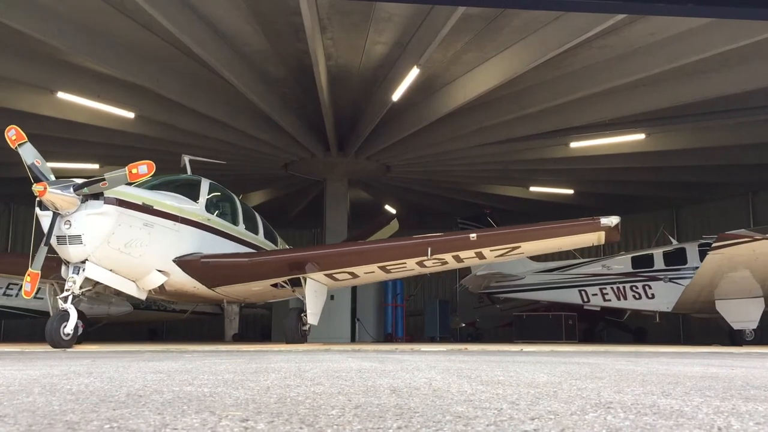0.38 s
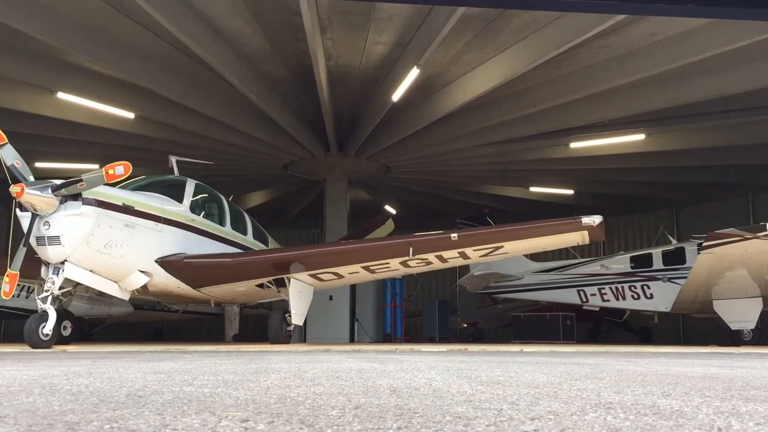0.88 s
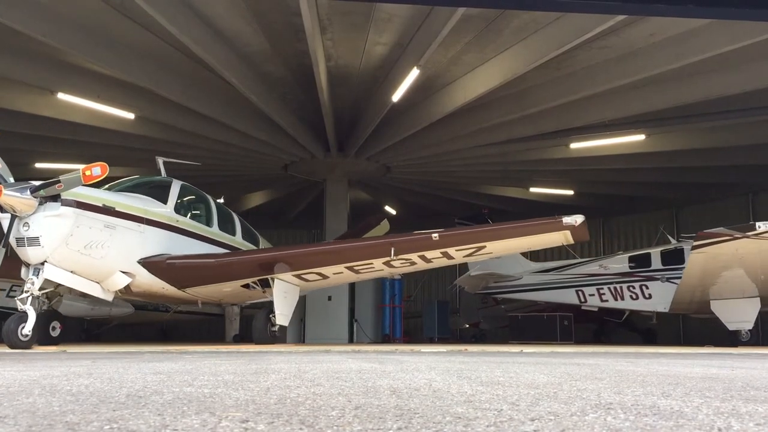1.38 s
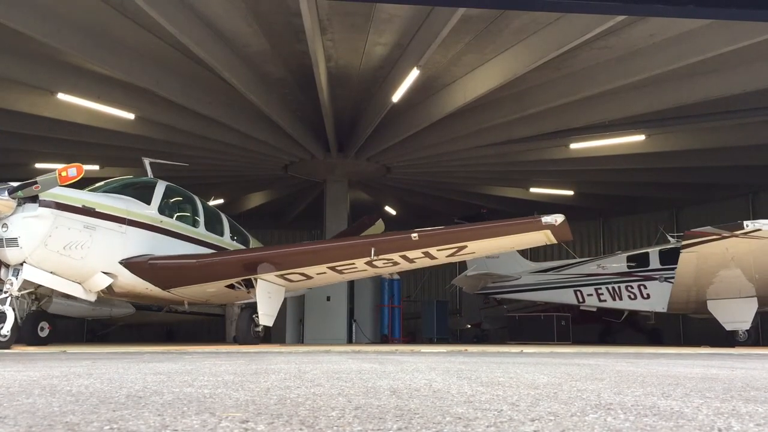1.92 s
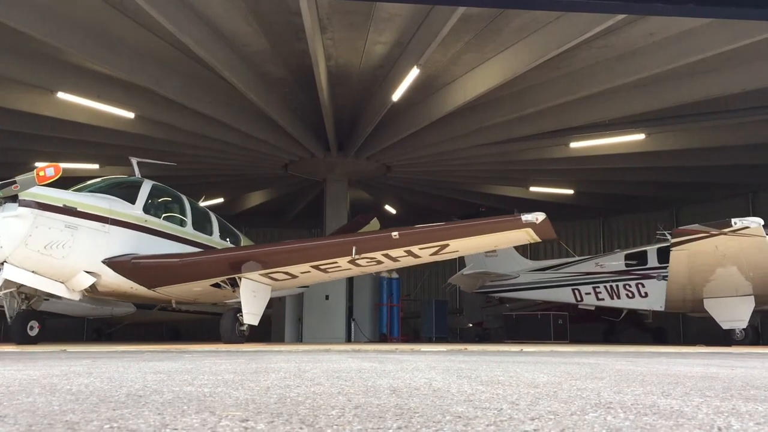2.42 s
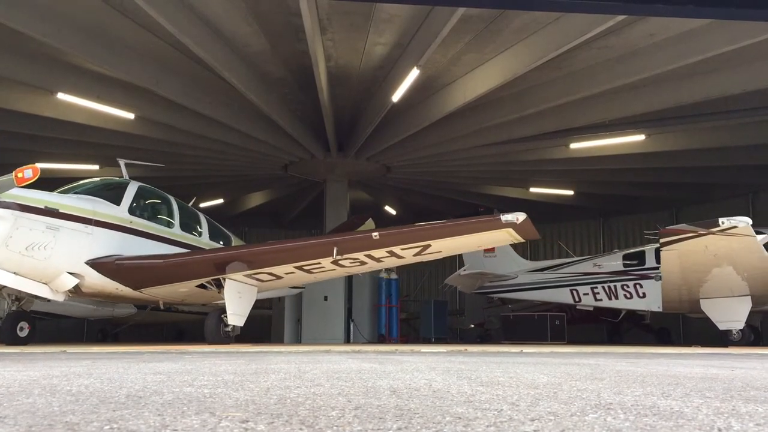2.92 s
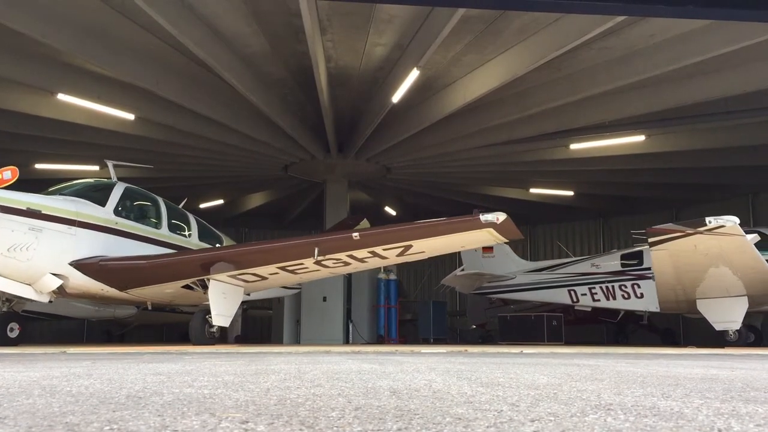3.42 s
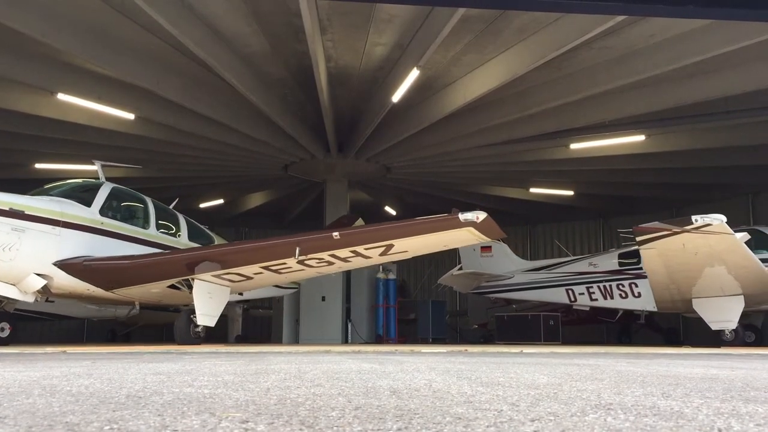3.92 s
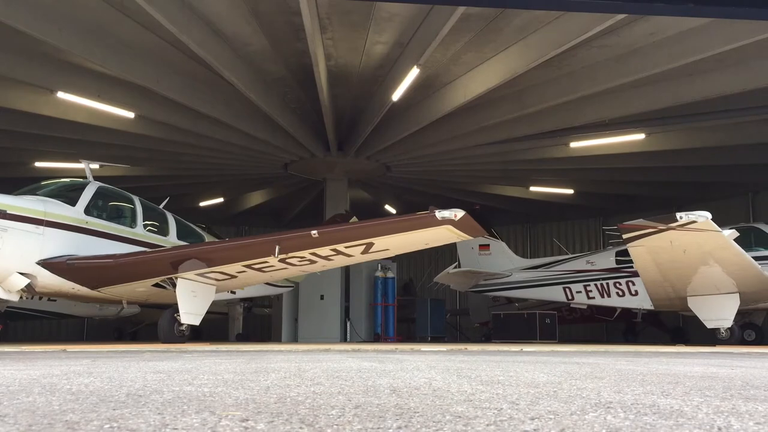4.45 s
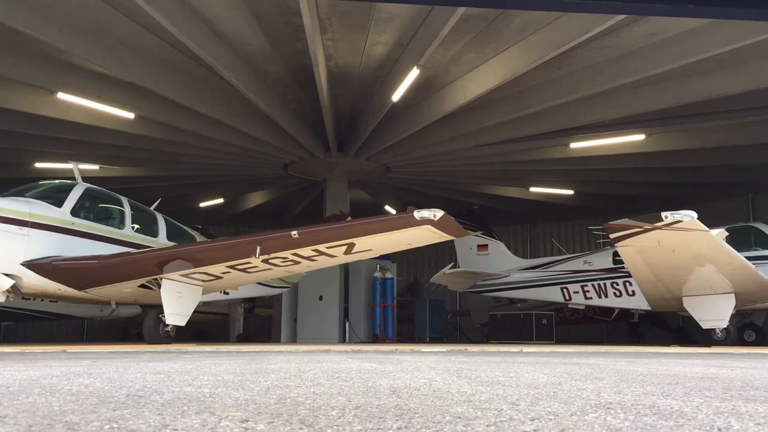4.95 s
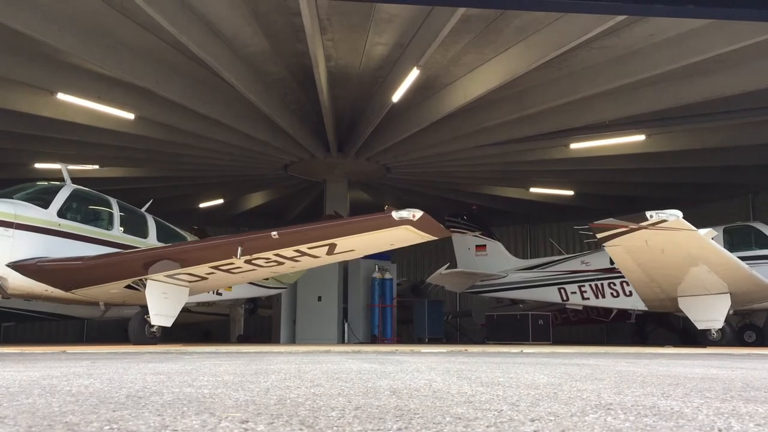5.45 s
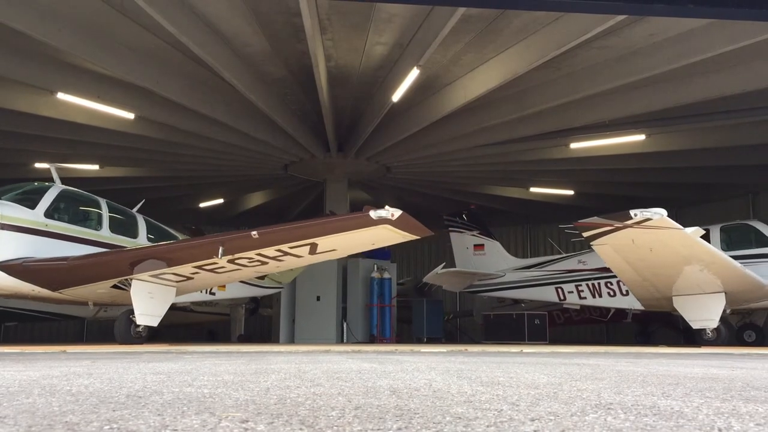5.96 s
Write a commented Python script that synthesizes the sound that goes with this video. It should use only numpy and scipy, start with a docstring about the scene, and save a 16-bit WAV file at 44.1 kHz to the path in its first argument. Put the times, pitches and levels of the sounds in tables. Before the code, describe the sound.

A deep, bass-heavy rumble is present from 0 to 6 seconds, as rollers carry a large steel turntable with small aircraft around a round hangar. It wavers gently, with quiet gritty rolling noise above. At about 0.47 s a heavy low double thump lands, the grit swells, and the frame groans in short mid-pitched slips until about 1 s; a small bright clack comes near 0.68 s. Faint dry scrapes occur mostly before 2.6 s. A very thin, steady gear whine is slightly clearer between 1 and 3 s. Light metallic ticks thicken from 1.7 s, with a sharper one at 2.6 s. Another low thump falls at 3.0 s and a softer one at 4.5 s, each dying in long echo. Ticks at 4.3 s and a busier cluster from 5.2 s lead to the end, with tiny chirps near 5.6 s. Faint phone microphone hiss stays constant; the rumble continues until the cut.

```python
"""A deep rumble rolls from the start: rollers on their rail shake the deck of a large steel turntable
that turns slowly in a round hangar. Filtered, wavering noise makes the rumble and its grit.
Low thumps, a bright clack, broad washes and groans are short noise swells in a long echo of dying noise.
Small parts tick as struck modes, metal scrapes in dense grains and chirps thinly as it rubs.
The drive whines faintly as one wavering tone; a phone microphone adds steady hiss."""
import sys
import numpy as np
from scipy import signal
from scipy.fft import rfft, irfft, next_fast_len
from scipy.io import wavfile
from scipy.ndimage import uniform_filter1d

SR = 44100
rng = np.random.default_rng(int(sys.argv[2]) if len(sys.argv) > 2 else 0)


def field_ratio(decibels):
    """Amplitude ratio for a level in dB (20 dB per decade); scalars and array-likes work."""
    return 10 ** (np.asarray(decibels, dtype=float) / 20)


def dump(signal):
    """Clip the signal to [-1, 1] and save it as 16-bit WAV at the path in sys.argv[1]."""
    limited = np.clip(np.atleast_2d(signal).T, -1, 1)
    pcm = np.round(limited * 32767).astype(np.int16)
    wavfile.write(sys.argv[1], SR, pcm)


N = 268569  # length of the scene in samples


def rms_one(x):
    """Scale to unit rms."""
    return x / np.sqrt(np.mean(x ** 2) + 1e-20)


def filtered(x, order, hz, kind="low"):
    """Butterworth filter with its corner or corners at hz."""
    return signal.sosfilt(signal.butter(order, hz, kind, fs=SR, output="sos"), x)


def drift(rate_hz):
    """Slow random wander with spread 1: noise at a fortieth of SR, twice through a one-pole low-pass."""
    r = np.exp(-80 * np.pi * rate_hz / SR)
    noise = rng.standard_normal(N // 40 + 2002)
    slow = signal.lfilter([1], [1, -2 * r, r * r], noise)[2000:]  # drop the filter's run-in
    return np.interp(np.arange(N) / 40, np.arange(len(slow)), rms_one(slow))


def coloured_noise(spectrum, patchy_db, rate_hz):
    """Noise of the given spectrum whose overlapping half-octave bands each waver in level; rms 1."""
    size = next_fast_len(N)
    octave = np.log2(np.maximum(np.fft.rfftfreq(size, 1 / SR), 1))
    hz, level_db = np.transpose(spectrum)
    shape_db = np.interp(octave, np.log2(hz), level_db, -150, -150)
    bins = rfft(rng.standard_normal(size)) * field_ratio(shape_db)
    out = np.zeros(N)
    for centre in np.arange(np.floor(np.log2(hz[0])), np.log2(hz[-1]) + .5, .5):
        band = np.clip(1 - 2 * np.abs(octave - centre), 0, 1)
        out += irfft(bins * band, size)[:N] * field_ratio(patchy_db * drift(rate_hz))
    return rms_one(out)


def resonance(x, hz, width_hz):
    """Two-pole band-pass, gain 1 on top."""
    r = np.exp(-np.pi * width_hz / SR)
    poles = [1, -2 * r * np.cos(2 * np.pi * hz / SR), r * r]
    return signal.lfilter(np.array([1, 0, -1]) * (1 - r * r) / 2, poles, x)


def ring(clicks, modes):
    """Every click strikes every decaying mode with a strength of its own."""
    contact_width_hz = 300  # a soft contact lets each mode build up over about a millisecond
    out = np.zeros(N)
    for hz, level_db, t60_s in modes:
        r, w = field_ratio(-60 / (t60_s * SR)), 2 * np.pi * hz / SR
        blows = clicks * field_ratio(level_db + 1.6 * rng.standard_normal(N)) + 1e-18
        mode = signal.lfilter([0, np.sin(w)], [1, -2 * r * np.cos(w), r * r], blows)
        out += resonance(mode, hz, contact_width_hz)
    return out


def swells(rows):
    """Each row is a short swell of steeply banded noise, its own flutter partly evened out."""
    out, size = np.zeros(N + SR), SR // 2
    t = np.arange(size) / SR
    for start_s, level_db, hz, width_hz, length_s in rows:
        band = rng.standard_normal(2 * size)
        for _ in range(4):
            band = resonance(band, hz, 2 * width_hz)
        band = rms_one(band[size:])
        band = band / np.sqrt(.3 + uniform_filter1d(band ** 2, size=int(SR / width_hz)))
        rise = np.sin(np.pi / 2 * np.clip(t / length_s, 0, 1)) ** 2
        fall = np.exp(1 - t / length_s)
        out[round(start_s * SR):][:size] += field_ratio(level_db) * band * rise * fall
    return filtered(out[:N], 2, 12000)


def hall(x):
    """Diffuse echo: dying noise, the treble dying faster, after a short gap."""
    t60_s, treble_t60_s, split_hz, gap_s = 2.8, .3 * 2.8, 2500, .008
    t = np.arange(3 * SR) / SR
    tail = rng.standard_normal(len(t)) * (t > gap_s)
    low = filtered(tail, 1, split_hz)
    echo = low * field_ratio(-60 * t / t60_s) + (tail - low) * field_ratio(-60 * t / treble_t60_s)
    return signal.fftconvolve(x, echo / np.sqrt(np.sum(echo ** 2)))[:N]


def near_echoes(x):
    """Deck, aircraft and roof send back a scattered group of echoes soon after each tick."""
    gap_s, bend_s = .007, .024
    t = np.arange(SR // 10) / SR
    # falls 300 dB per second, and 1000 dB per second after the bend
    window = (t > gap_s) * field_ratio(-np.maximum(t - bend_s, 0) * 700 - t * 300)
    scattered = rng.standard_normal(len(t)) * (rng.random(len(t)) < .08)
    echo = scattered * window
    return signal.fftconvolve(x, echo / np.sqrt(np.sum(echo ** 2)))[:N]


# Loudness of the drive gears: time_s, level_db (rms)
WHINE_LEVELS = [(0, -66), (1.1, -61.5), (2.5, -61), (4.2, -66), (6.09, -68)]


def whine():
    """The drive's gears give a thin sine tone that wavers a little in pitch."""
    pitch_hz = 894.5 + .6 * drift(1.2)
    time_s, level_db = np.transpose(WHINE_LEVELS)
    level = field_ratio(np.interp(np.arange(N) / SR, time_s, level_db))
    return level * np.sqrt(2) * np.sin(2 * np.pi * np.cumsum(pitch_hz) / SR)


# Thin chirps of rubbing metal: start_s, level_db, pitch_hz
CHIRPS = [(3.995, -74.5, 8000), (5.603, -70.5, 5090), (5.603, -75.5, 6100), (5.678, -73, 6120),
          (5.678, -79, 7800), (5.678, -75.5, 9000), (5.722, -77, 6800)]


def chirps():
    """Rubbing metal sings briefly in narrow bands of noise."""
    width_hz, length_s = 300, .008
    return swells([(*row, width_hz, length_s) for row in CHIRPS])


# Upper modes of the small metal parts, rung by scrapes and ticks: pitch_hz, level_db, t60_s
HIGH_MODES = [(4050, -2, .02), (5450, -1, .021), (5750, -2, .019), (6680, -1, .019), (6950, -1, .019),
              (7260, -2, .018)]
# Gritty scrapes: start_s, level_db (before the envelope's shape), length_s
SCRAPES = [(0.057, -76, 0.022), (0.207, -79, 0.027), (0.629, -82, 0.012), (0.68, -82.5, 0.0055),
           (0.693, -78.5, 0.03), (0.739, -78, 0.024), (1.128, -78.5, .02), (1.267, -81, 0.012),
           (1.331, -79, 0.024), (1.998, -79.5, 0.032), (2.044, -82.5, .03), (2.28, -78, 0.008),
           (2.616, -78.5, 0.022), (5.676, -78.5, 0.016)]


def scrapes():
    """Dense uneven grains rise fast and die away, heard bare and through the parts' upper modes."""
    grains_per_s, ring_over_bare_db = 5000, 1
    t, force = np.arange(N) / SR, np.zeros(N)
    for start_s, level_db, length_s in SCRAPES:
        age = np.maximum(t - start_s, 0) / length_s
        envelope = np.minimum(8 * age, 1) * np.exp(1 - age - age ** 2)
        force += field_ratio(level_db) * (t > start_s) * envelope
    grains = (rng.random(N) < grains_per_s / SR) * rng.standard_normal(N)
    bare = rms_one(filtered(grains, 3, [3500, 8000], "band"))
    rung = rms_one(ring(grains, HIGH_MODES))
    return force * rms_one(bare + field_ratio(ring_over_bare_db) * rung)


# Lower modes of the small metal parts: pitch_hz, level_db, t60_s
LOW_MODES = [(2930, -5, .03), (3080, -3, .03), (3190, -4, .03), (3260, -5, .03), (3370, -11, .02),
             (3800, -12, .025), (4560, -14, .022)]
# Ticks of small parts: start_s, strike_db (on the lower modes), treble_db (upper strike over lower)
TICKS = [(.065, -78, -3), (0.1292, -69, -5), (.9964, -67.5, 0), (1.1265, -67.5, -4.5), (1.134, -62, -5),
         (1.332, -71, 1), (1.3593, -69.5, -3), (1.392, -69, 0.5), (1.552, -71, -1.5), (1.7063, -63.5, -4.5),
         (1.766, -59, -7), (1.8043, -62, -12), (1.921, -57, -11.5), (2, -64.5, -9.5), (2.03, -68.5, -1),
         (2.172, -61.5, -19), (2.272, -67, -12.5), (2.528, -66, -9), (2.581, -64.5, -4.5), (2.609, -54, -9),
         (2.692, -64.5, -7.5), (2.758, -66.5, 1), (2.9795, -58, -16.5), (3.0537, -71.5, 0),
         (3.3626, -63, -7), (3.459, -62, -15.5), (3.5638, -63.5, -12), (3.9092, -62, -6),
         (4.2971, -52.5, -15.5), (4.456, -61, -13), (4.47, -55, -15), (4.6283, -63, -14.5),
         (4.7182, -63.5, -11.5), (4.789, -61.5, -7), (4.9147, -58.5, -23), (5.225, -64, -22.5),
         (5.312, -63, -30.5), (5.39, -60, -23), (5.42, -68, -19.5), (5.467, -53.5, -18.5),
         (5.5253, -64, -20), (5.594, -62, -18), (5.636, -55, -18), (5.694, -59, -7), (5.746, -60, -18),
         (5.8124, -61, -28), (5.833, -56, -17)]


def ticks():
    """Placed ticks and a fainter random chatter ring the same parts; soft contact spares the top treble."""
    chatter_per_s, chatter_db, chatter_treble_db = 60, -75, -10.5
    start_s, strike_db, treble_db = np.transpose(TICKS)
    low, high = np.zeros((2, N))
    at = np.round(start_s * SR).astype(int)
    low[at] = field_ratio(strike_db)
    high[at] = field_ratio(strike_db + treble_db)
    # the chatter crowds and thins slowly around its usual rate; a few of its clicks are stronger
    born = rng.random(N) < chatter_per_s * field_ratio(3.0 * drift(1.5)) / SR
    chatter = born * field_ratio(chatter_db + 2.5 * np.minimum(rng.exponential(1, N), 3))
    rung = ring(low + chatter, LOW_MODES)
    rung += ring(high + field_ratio(chatter_treble_db) * chatter, HIGH_MODES)
    return filtered(rung, 4, [2400, 7900], "band")


# The frame groans in slips: start_s, level_db, pitch_hz, length_s
GROANS = [(0.463, -41, 987, 0.027), (.47, -41.5, 730, .04), (.48, -44.5, 960, 0.097),
          (0.542, -43, 887, .02), (0.596, -43, 946, 0.034), (0.652, -45, 910, 0.036),
          (0.722, -48.5, 966, 0.022), (0.769, -47, 910, 0.025), (0.861, -49.5, 993, 0.024),
          (0.961, -48.5, 940, 0.015)]


def groans():
    """Each slip of the frame is a swell of noise in one band."""
    width_hz = 155
    return swells([(start_s, db, hz, width_hz, length_s) for start_s, db, hz, length_s in GROANS])


# Low thumps, a bright clack near .68 s, a small tick at .241 s and broad washes:
# start_s, level_db, pitch_hz, width_hz, length_s
THUMPS_AND_CLACK = [(.241, -58.5, 3450, 300, 0.0037), (.465, -24.5, 163.5, 69.5, 0.035),
                    (.47, -34.5, 262, 69.8, .03), (.5, -38.5, 460, 120, 0.017),
                    (.525, -24.5, 126.6, 59.6, 0.023), (.679, -52.5, 2475, 1172, 0.0028),
                    (.679, -59, 4210, 701, .003), (.679, -67, 5770, 903, 0.003),
                    (.681, -54.5, 2480, 1092, 0.0084), (.69, -65, 3980, 1510, 0.0087),
                    (.695, -73.5, 6920, 690, 0.012), (.745, -64, 2550, 894, 0.01),
                    (1.76, -70, 2830, 1780, 0.084), (2.91, -42, 334, 100, 0.0086),
                    (2.99, -34.5, 575, 75.1, 0.026), (3.0, -26, 151, 48.5, 0.042),
                    (3.0, -57.5, 1196, 398, 0.13), (3.135, -43, 575, 69.5, .012),
                    (4.48, -31.5, 159, 70, 0.027), (4.51, -31.5, 356, 110, 0.02),
                    (4.549, -61, 1850, 251, 0.023)]


def thumps_and_clack():
    """Thumps, clack, tick and washes are short swells of banded noise, some built of several bands."""
    return swells(THUMPS_AND_CLACK)


# Spectrum of deck and rail, relative: pitch_hz, level_db (per Hz)
RUMBLE = [(18, -42), (30, -22.5), (58, 1), (72, 2.5), (84, 2), (98, 1.5), (118, -5), (136, -7.5), (152, -6),
          (173, -5.5), (197, -11.5), (240, -15.5), (282, -17), (312, -19), (454, -23.5), (553, -24.5),
          (680, -28.5), (832, -33.5), (1010, -34.5), (1500, -48), (1950, -79.5), (3300, -120)]
# Spectrum of the dirt under the rollers, relative: pitch_hz, level_db (per Hz)
GRIT = [(650, -24), (1100, -0.5), (1550, -5), (1800, -10), (2630, -17), (3120, -21), (3600, -23),
        (4940, -34), (6890, -33), (8000, -44.5), (10400, -72.5), (17600, -120)]
# Stretches of rail that alter the grit as they pass under the rollers: top_s, grit_rise_db
ROUGH_SPOTS = [(.1, 1.5), (.3, 2.5), (.5, 5.5), (.7, 1.5), (1.82, 2), (2.02, -0.5), (3.03, 4.5), (3.25, 1),
               (3.45, 1), (4.34, 1.8), (4.55, 2.9)]


def rollers():
    """Rough rolling contact shakes the deck; finer grit sounds above it and swells on rough spots."""
    rumble_db, grit_db = -25, -63.5  # steady rolling, before the rough spots
    rise_s, fall_s = .05, .4  # quick onset, slow dying in the hall
    rumble_share, deck_mass_hz = .22, 120  # the rumble takes this share of the grit's rise in dB
    t, rise_db = np.arange(N) / SR, np.zeros(N)
    for top_s, top_db in ROUGH_SPOTS:
        age = t - top_s
        rise_db += top_db * np.exp(-np.where(age < 0, (age / rise_s) ** 2, age / fall_s))
    rumble = field_ratio(rumble_db) * coloured_noise(RUMBLE, patchy_db=1.22, rate_hz=6.0)
    # the heavy deck keeps its level at the bottom; only the part above it rises
    deck_filter = signal.butter(2, deck_mass_hz, fs=SR, output="sos")
    upper = rumble - signal.sosfiltfilt(deck_filter, rumble)
    rumble = rumble + (field_ratio(rumble_share * rise_db) - 1) * upper
    grit = field_ratio(grit_db + rise_db) * coloured_noise(GRIT, patchy_db=2.5, rate_hz=22.0)
    return rumble + grit


def scene():
    """Everything in the hangar, heard from the floor."""
    heavy = thumps_and_clack() + groans()
    tick = ticks()
    rubbing = chirps() + scrapes()
    direct = rollers() + whine() + heavy + tick + rubbing
    late = hall(field_ratio(-7.5) * (heavy + tick + rubbing))
    return (direct + late + field_ratio(-4.5) * near_echoes(tick))[None]


def top_cut(x):
    """Nothing passes above the cut-off."""
    return signal.sosfilt(signal.butter(12, 15740, fs=SR, output="sos"), x)


# Spectrum of the microphone's hiss, relative: pitch_hz, level_db (per Hz)
HISS = [(2500, -18), (3800, 1.5), (5500, -2.5), (7200, -8), (8000, -6), (11000, -7.5), (15700, -13.5)]
# Notches of the microphone housing: pitch_hz, width_hz, depth (0-1)
NOTCHES = [(5000, 340, 0.3), (10470, 680, 0.5)]


def record(dry):
    """Phone microphone: steady hiss, bass cut, housing notches, end fades and softly rounded peaks."""
    hiss_db, bass_cut_hz, fade_s, ceiling = -79, 45, .004, .4
    sound = dry + field_ratio(hiss_db) * coloured_noise(HISS, patchy_db=.2, rate_hz=4.0)
    sound = filtered(sound, 4, bass_cut_hz, "high")
    for hz, width_hz, depth in NOTCHES:
        sound = sound - depth * resonance(sound, hz, width_hz)
    from_end = np.minimum(np.arange(N), np.arange(N)[::-1])  # samples to the nearer end
    sound = sound * np.clip(from_end / (fade_s * SR), 0, 1)
    mix = ceiling * np.tanh(sound / ceiling)
    return top_cut(mix)


dry = scene()
out = record(dry)
dump(out)
```